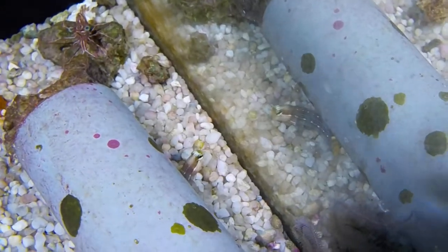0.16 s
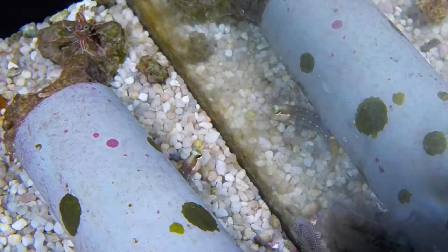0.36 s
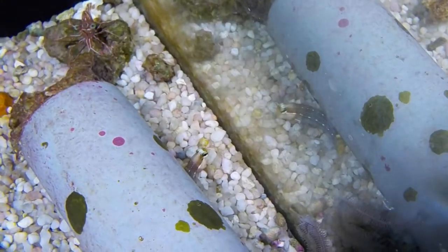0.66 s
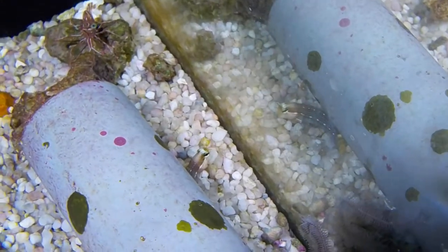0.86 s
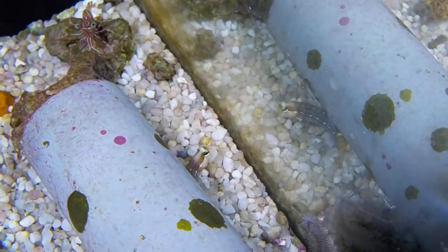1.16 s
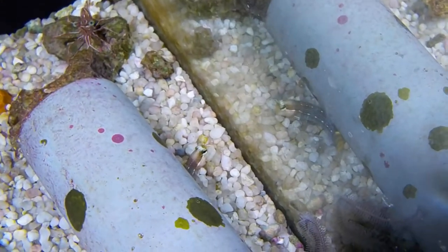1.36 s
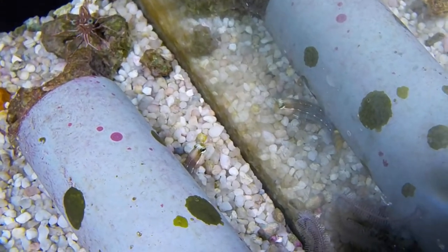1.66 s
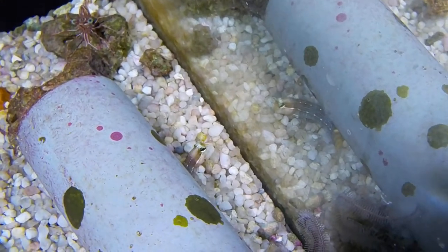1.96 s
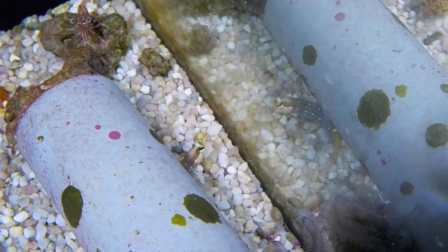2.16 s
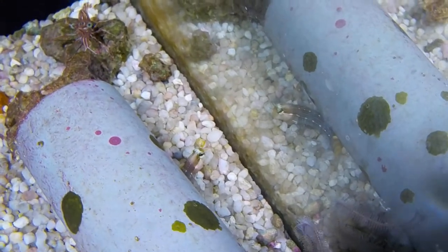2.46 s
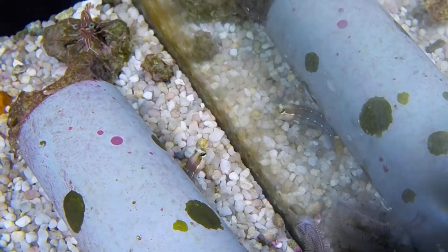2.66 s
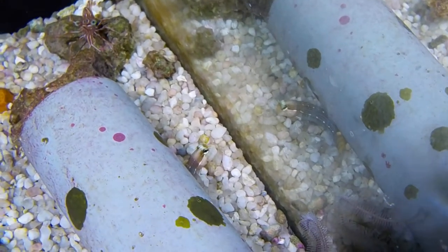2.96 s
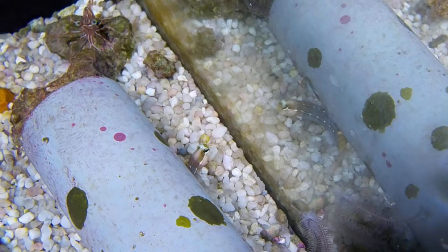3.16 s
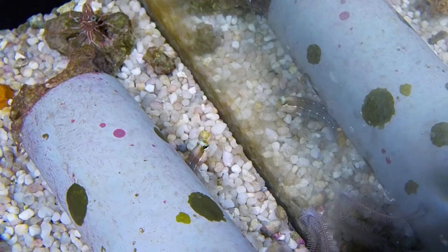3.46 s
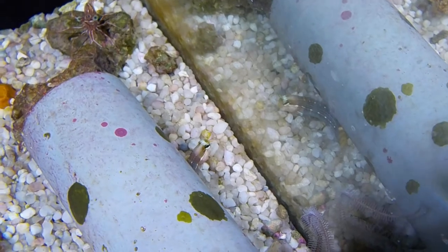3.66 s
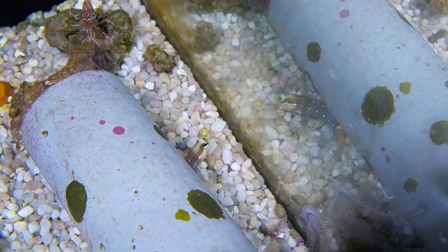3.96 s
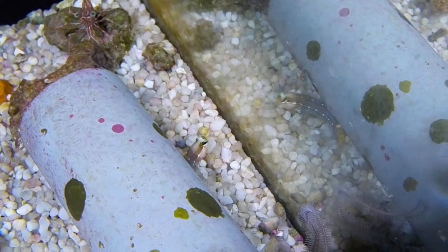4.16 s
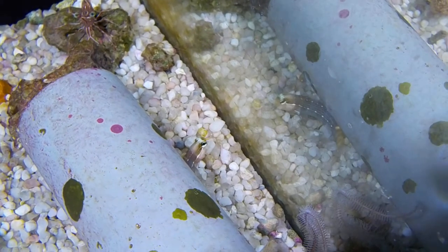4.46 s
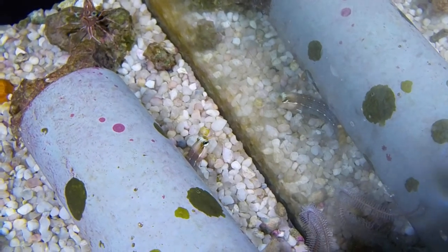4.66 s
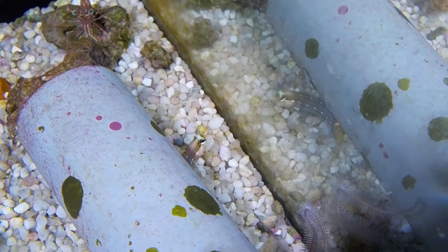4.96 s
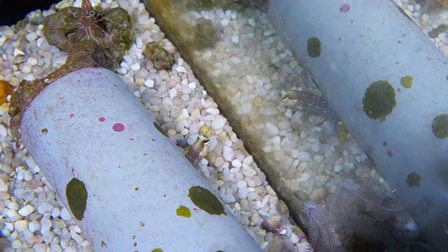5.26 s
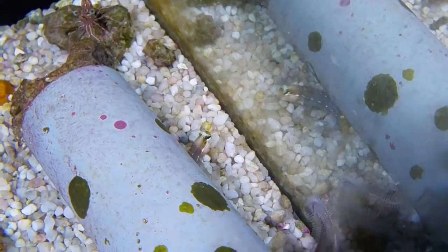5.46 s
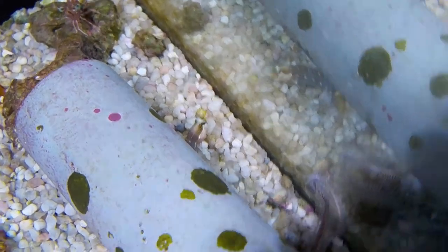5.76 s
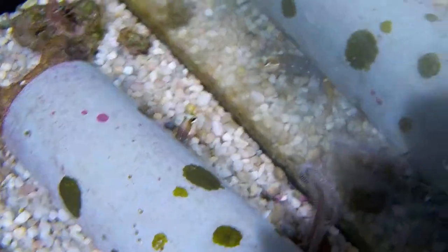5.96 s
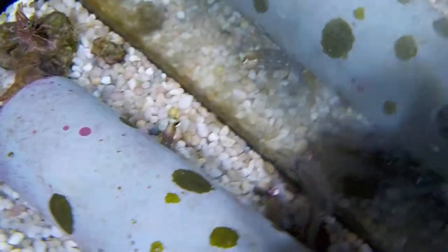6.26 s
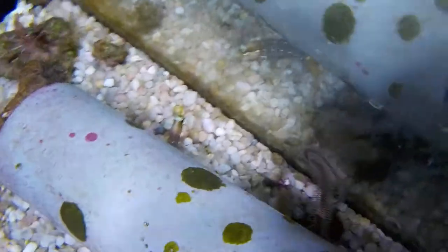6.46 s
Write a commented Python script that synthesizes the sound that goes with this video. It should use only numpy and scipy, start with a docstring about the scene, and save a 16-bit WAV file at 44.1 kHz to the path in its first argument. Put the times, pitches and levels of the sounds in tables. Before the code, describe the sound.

Tiny bubbles fizz brightly at the surface of an indoor aquarium, with short, high pops and faint ticks coming at irregular moments. Underneath, the pumps hum and buzz without a break and water circulates with an even, lightly gurgling rush. A hand-held microphone creeps toward the tank, then closes in faster late on, changing the colour of the sound before the pumps and water swell a little.

```python
"""From the start, mains-driven aquarium pumps buzz through the tank and its stand while water rushes
through the filter. All along, tiny bubbles burst at the surface as a bright fizz, with faint ticks
and some distinct pops. A hand-held camera with two microphones creeps toward the tank, then moves in
quickly from 5.2 s, which shifts the tone of the buzz and the fizz. Just after 6 s the pumps and the
water swell a little."""
import sys
import numpy as np
from scipy import signal
from scipy.fft import rfft, irfft, next_fast_len
from scipy.io import wavfile
from scipy.ndimage import uniform_filter1d

SR = 44100
rng = np.random.default_rng(int(sys.argv[2]) if len(sys.argv) > 2 else 0)


def digitize_waveform(pressure):
    """Quantize a signal to 16-bit integers and store it at the path in sys.argv[1].

    Rows of a 2-D input are taken as channels; values are limited to [-1, 1].
    """
    field = np.atleast_2d(pressure).T
    bounded = np.clip(field, -1, 1)
    quanta = np.round(bounded * 32767).astype(np.int16)
    wavfile.write(sys.argv[1], SR, quanta)


N = 291060
T = np.arange(N) / SR
RUSH_TOP_HZ = 2480  # the water's rush lies below this pitch, the fizz above it


def gain_of(db):
    """Turns decibels into a number to multiply a sound by."""
    return 10 ** (np.asarray(db) / 20)


def unit_level(x):
    """Scales a signal to an average (rms) size of 1."""
    return x / np.sqrt(np.mean(x ** 2) + 1e-20)


def flattened(x):
    """Makes lows and highs equally strong, so that a table alone sets the tone."""
    spectrum = rfft(x)
    power = uniform_filter1d(abs(spectrum) ** 2, size=2000)
    return unit_level(irfft(spectrum / np.sqrt(power + 1e-9), N))


def drift(rate_hz, count=20):
    """A random wobble of average size 1: slow waves added up, none faster than rate_hz."""
    hz = np.geomspace(rate_hz / 20, rate_hz, count)[:, None]
    coarse_t = T[::256]
    waves = np.sin(2 * np.pi * (hz * coarse_t + rng.random((count, 1)))) / np.sqrt(hz)
    return np.interp(T, coarse_t, unit_level(waves.sum(0)))


def bump(t, rise_ms, fall_ms):
    """A smooth rise and fall that peaks at 1 when t = 0."""
    return np.exp(-0.5 * (t * 1000 / np.where(t < 0, rise_ms, fall_ms)) ** 2)


def nearness(move_in_s=5.2):
    """How close the camera is, from -0.15 (far) to 1.4 (closest): a slow creep, then a quick move."""
    return -0.15 + 0.052 * T + 0.87 * np.maximum(T - move_in_s, 0)


def swell(start_s=6.05, rise_s=0.36):
    """Goes from 0 to 1 as pumps and water grow louder with the camera close by."""
    return np.clip((T - start_s) / rise_s, 0, 1)


# Sound travels a different distance to each microphone, so its waves arrive out of step.
# (pitch [Hz], left ahead by [rad])
LEFT_LEAD = [(320, -1.5), (530, -1.4), (900, -0.3), (1500, 0.0), (2050, -0.9), (2650, -1.4), (3000, -0.1),
             (3700, 0.9), (4100, 0.0), (4500, -0.1), (5200, -1.9), (6000, 0.1), (6800, -0.2)]

def at_microphones(direct, scattered, table, low_hz, top_hz):
    """Shapes one band of noise by a table; the right side blends direct and scattered sound."""
    table_hz, *columns = np.transpose(table)
    size = next_fast_len(N)
    hz = np.fft.rfftfreq(size, 1 / SR)
    left_db, right_db, alike = (np.interp(np.log(hz + 1), np.log(table_hz + 1), c) for c in columns)
    lead = np.interp(hz, *np.transpose(LEFT_LEAD))
    alike = np.clip(alike, 0, 1)
    left = rfft(direct, size)
    right = alike * np.exp(-1j * lead) * left + np.sqrt(1 - alike ** 2) * rfft(scattered, size)
    in_band = (hz >= low_hz) & (hz < top_hz)
    pair = np.array([gain_of(left_db) * left, gain_of(right_db) * right]) * in_band
    return np.sqrt(SR / 2) * irfft(pair, size)[:, :N]


def with_echoes(sound, fade_s, echo_db):
    """A surface sound reaches each microphone directly, then as short echoes off glass and lid."""
    t = np.arange(2500) / SR
    paths = rng.standard_normal((2, len(t))) * gain_of(-60 * t / fade_s) * (t > 0.0008)
    paths *= gain_of(echo_db) / np.linalg.norm(paths, axis=1, keepdims=True)
    paths[:, 0] = 1  # the direct path
    return signal.convolve(sound[None], paths)


def place(out, sound, start, db, pan_db):
    """Adds a sound at sample number start, with the left side pan_db louder than the right."""
    out[:, start:start + sound.shape[1]] += gain_of([[db + pan_db / 2], [db - pan_db / 2]]) * sound


# The clearest ticks, probably from the smallest bubbles.
# (time [s], level [dB], pitch [Hz], left minus right [dB])
CLEAR_TICKS = [(0.8169, -55, 9500, 1.0), (0.9292, -56, 8840, 0.5), (0.9945, -56, 9520, 1.0),
               (1.016, -54, 9730, 0.5), (1.3941, -56, 9590, 3.0), (1.6979, -53, 9550, 2.0),
               (2.326, -56, 8860, 0.0), (2.3949, -55, 11400, -1.0), (3.703, -56, 9510, 1.0),
               (3.7767, -54, 9630, 1.5), (5.0578, -58, 9720, 1.0), (5.233, -55, 9960, 1.0),
               (5.3581, -55, 9770, 0.0), (5.3965, -53, 9900, 0.0), (5.5217, -55, 9060, 1.0),
               (6.0266, -51, 9000, 3.0)]

def ticks(faint_count=70):
    """Very short, quiet rings in the high treble: the listed ones plus fainter ones at random."""
    out, t = np.zeros((2, N + 3000)), np.arange(-100, 100) / SR
    times = rng.uniform(100, N, faint_count) / SR
    # random level [dB], pitch [Hz] and left minus right [dB]: averages first, then spreads
    faint = rng.normal([-62, 9600, 0], [3, 400, 4], (faint_count, 3))
    for time_s, db, hz, pan_db in CLEAR_TICKS + list(zip(times, *faint.T)):
        ring = bump(t, rise_ms=0.3, fall_ms=0.6) * np.sin(2 * np.pi * hz * t)
        heard = with_echoes(ring, fade_s=0.04, echo_db=0)
        place(out, heard, round(time_s * SR) - 100, db, pan_db)
    return out[:, :N]


def bubble_swarm(base_per_s=1200, spread_db=6.0, pitch_count=14):
    """Many small bubbles burst at random times and strengths; the higher ones ring more briefly."""
    chance = gain_of(2.5 * drift(30)) * base_per_s / SR
    strength = gain_of(spread_db * np.minimum(rng.exponential(1, N), 2.9))
    bursts = strength * (rng.random(N) < chance)
    which_pitch = rng.integers(0, pitch_count, size=N)
    swarm, t = np.zeros((2, N)), np.arange(200) / SR
    for k, hz in enumerate(np.geomspace(2400, 13000, pitch_count)):
        ring = np.sin(2 * np.pi * hz * t) * np.exp(-t * hz / 1.96) * (1 - np.exp(-t * hz / 1.9))
        heard = with_echoes(ring / np.linalg.norm(ring) * np.sqrt(hz), fade_s=0.063, echo_db=4.8)
        swarm += signal.oaconvolve((bursts * (which_pitch == k))[None], heard, axes=1)[:, :N]
    return flattened(swarm)


# The tone of the fizzing bubbles, and of the hiss above them. Both tables list
# (pitch [Hz], left base level [dB per Hz], right base level [dB per Hz], how alike the sides are [0-1])
FIZZ_TONE = [(2480, -101, -102, 0.09), (2650, -86, -86, 0.75), (2800, -86, -85, 0.87),
             (2980, -94, -92, 0.88), (3170, -87, -83, 0.88), (3300, -88, -83, 0.88), (3500, -79, -78, 0.85),
             (3760, -80, -81.5, 0.81), (3960, -72.5, -75.5, 0.72), (4150, -71, -72.5, 0.68),
             (4420, -74, -74, 0.7), (4560, -73, -71, 0.72), (4730, -77, -74, 0.6), (4890, -75, -72, 0.5),
             (5200, -76, -76, 0.25), (6000, -78, -81, 0.27), (6800, -77, -81, 0.62), (7300, -90, -87, 0.43),
             (7700, -105, -105, 0.12), (8100, -117, -118, 0.0)]
HISS_TONE = [(8100, -117, -118, 0.0), (8600, -104, -106, 0.28), (9300, -101, -103, 0.24),
             (11000, -104, -104, 0.13), (13000, -108, -108, 0.41), (15500, -106, -106, 0.69),
             (15800, -105, -105, 0.75)]

def fizz(blur_share=0.59, shadow_hz=3460, hiss_from_hz=8100):
    """Small bubbles over the blur of far ones; the lowest part is shadowed as the camera nears."""
    swarm, near = bubble_swarm(), nearness()
    blur = rng.standard_normal((2, N))
    bubbles = np.sqrt(1 - blur_share) * swarm + np.sqrt(blur_share) * blur
    low = gain_of(0.6 - 4 * near) * at_microphones(*bubbles, FIZZ_TONE, RUSH_TOP_HZ, shadow_hz)
    main = gain_of(1.3 * near - 1) * at_microphones(*bubbles, FIZZ_TONE, shadow_hz, hiss_from_hz)
    # higher up, the microphones' own hiss hides most of the bubbles
    hiss = 0.26 * signal.sosfilt(signal.butter(2, 11000, fs=SR, output="sos"), swarm) + 0.86 * blur
    high = gain_of(0.8 * drift(16)) * at_microphones(*hiss, HISS_TONE, hiss_from_hz, SR / 2)
    return low + main + high


def bubble_pop(hz, snap, glide_per_s=20):
    """One bubble rings, rising in pitch as it opens; its snapping film adds a longer crackle."""
    t = np.arange(-150, 250) / SR
    ring = bump(t, rise_ms=0.37, fall_ms=0.64) * np.sin(2 * np.pi * hz * t * (1 + glide_per_s * t))
    grit = unit_level(uniform_filter1d(rng.standard_normal((2, len(t))), size=9))
    phase = 2 * np.pi * 1.12 * hz * t  # the crackle sits a little above the ring
    crackle = (grit[0] * np.cos(phase) + grit[1] * np.sin(phase)) * bump(t, rise_ms=0.43, fall_ms=1.5)
    crackle /= abs(crackle).max()
    return (1 - snap) * ring + 3.8 * snap ** 2 * crackle


# The loudest bubbles bursting at the surface.
# (time [s], base level [dB], pitch [Hz], left minus right [dB], snap [0 pure ring - 1 pure crackle])
LOUD_POPS = [(0.174, -27, 6870, 4, .2), (0.6324, -15.5, 4470, -1, 0.1), (0.6395, -33, 6440, 3, .2),
             (0.737, -28, 6700, 2, 0.43), (0.869, -24.5, 4700, -5, 0.49), (0.969, -16.5, 5300, 3, 0.44),
             (0.9836, -25, 4900, 0, .2), (1.005, -21, 4170, -1.0, .35), (1.0528, -33, 6810, 4, .2),
             (1.0668, -27.5, 6000, 6, .3), (1.0845, -20, 4200, 2.0, 0.4), (1.2218, -29, 4300, 0, 0.32),
             (1.2993, -29, 4040, -0.5, 0.28), (1.4388, -29, 4370, 2, 0.55), (1.4686, -25, 4200, 1.0, 0.53),
             (1.508, -29, 4300, 0, .45), (1.545, -28, 4530, -1.5, .2), (1.6436, -17.5, 4300, 0, 0.28),
             (1.7404, -27, 4060, 0.0, .3), (1.75, -22, 6500, 5, 0.33), (1.7821, -17, 4380, 2, 0.16),
             (2.077, -24, 4370, -0.5, 0.3), (2.079, -23, 4120, -0.5, 0.05), (2.301, -24.5, 4830, -2, 0.31),
             (2.41, -25, 7030, 1, .3), (2.4688, -27, 4230, 2, 0.33), (2.569, -28, 4760, -0.5, 0.33),
             (2.89, -24.5, 4300, 2, 0.52), (2.938, -28, 6450, 3.5, .3), (2.983, -32, 6360, 2, .2),
             (3.0054, -35, 5760, 2.5, .3), (3.0217, -22.5, 6700, 5, 0.27), (3.06, -26, 4170, 1.0, .3),
             (3.112, -25, 4500, 0, .35), (3.213, -28, 4500, -2, 0.48), (3.507, -28, 5600, 3, 0.67),
             (3.511, -28, 5300, 2, 0.51), (3.5465, -24, 6900, 2, .45), (3.557, -21.5, 5000, 2.5, 0.48),
             (3.575, -31, 6300, 0, .2), (3.7505, -28, 4900, 0, .3), (3.754, -22, 4030, 7, 0.32),
             (4.0707, -23.5, 5130, 2, 0.52), (4.1615, -26, 4800, 2, 0.33), (4.165, -20, 4300, 4, 0.43),
             (4.179, -26, 6400, 4, .3), (4.2885, -17, 4560, -4, .1), (4.538, -23.5, 4370, -3, .18),
             (4.877, -27, 4970, 0, .25), (4.923, -23, 5700, 3, 0.47), (5.073, -26, 4570, -4, .2),
             (5.157, -33, 4400, 0, .3), (5.227, -30, 6700, 10, 0.41), (5.235, -28, 5000, 4, 0.54),
             (5.415, -24.5, 5730, 4, .45), (5.535, -23.5, 4300, 2, 0.45), (5.543, -29, 5600, 2, 0.52),
             (5.6127, -18, 4370, 1.5, 0.43), (5.8692, -29, 4400, 2, .25), (5.869, -21.5, 6130, 7, 0.55),
             (5.93, -24, 4550, 3, 0.52), (6.386, -25, 5150, 1, 0.6), (6.4067, -26, 4600, 2.5, .45),
             (6.423, -27, 6090, 0.5, 0.46), (6.4744, -32, 4940, 0.0, 0.51)]

def pops(faint_count=30, faint_snap=0.49):
    """Larger bubbles pop, each with a short echo in the tank: the listed ones plus faint random ones."""
    out = np.zeros((2, N + 3000))
    times = rng.uniform(150, N - 150, faint_count) / SR
    # random level [dB], pitch [Hz] and left minus right [dB]: averages first, then spreads
    faint = rng.normal([-35, 5300, 0], [2.5, 900, 2], (faint_count, 3))
    faint_pops = [(time_s, *row, faint_snap) for time_s, row in zip(times, faint)]
    for time_s, db, hz, pan_db, snap in LOUD_POPS + faint_pops:
        # ringing pops stand clearer of their echo than snapping ones
        heard = with_echoes(bubble_pop(hz, snap), fade_s=0.036, echo_db=-5.5 + 11 * snap)
        place(out, heard, round(time_s * SR) - 150, db, pan_db)
    body = signal.sosfiltfilt(signal.butter(6, [3600, 7200], "bandpass", fs=SR, output="sos"), out[:, :N])
    top = signal.sosfiltfilt(signal.butter(4, [8700, 12500], "bandpass", fs=SR, output="sos"), out[:, :N])
    return body + gain_of(-23) * top  # the microphones pass only a trace of the highest snap


# The tone of water rushing through the pumps and filter.
# (pitch [Hz], left base level [dB per Hz], right base level [dB per Hz], how alike the sides are [0-1])
RUSH_TONE = [(30, -112, -113, 0.29), (67, -113, -113, 0.31), (176, -93.5, -104, 0.8),
             (223, -88.5, -88, 0.7), (270, -88, -100, 0.6), (322, -89, -91, 0.8), (351, -75, -87, 1),
             (387, -82, -80.5, 0.97), (433, -74.5, -78.5, 0.97), (514, -67, -67, 1), (540, -71.5, -65.5, 1),
             (610, -66, -64.5, 0.8), (635, -72, -70, 0.4), (722, -72, -59, 0.7), (827, -71, -65.5, 1),
             (1010, -66, -64.5, 0.84), (1250, -68.5, -67.5, 1), (1510, -64.5, -66.5, 0.87),
             (1500, -72, -72.5, 0.87), (1680, -68, -67.5, 1), (1950, -67, -72.5, 1), (2084, -67, -76, 1),
             (2260, -82.5, -83, 0.7), (2407, -101, -102, 0.6)]

def water_rush(gurgle_db=0.95, gurgle_hz=14, split_hz=1100, hump_db=1.3, hump_gap_hz=14):
    """Water churns in pumps and filter; its lower and upper parts each gurgle in their own time."""
    hz = np.fft.rfftfreq(N, 1 / SR)
    # tank and stand ring at many close pitches, which roughens the rush
    humps = rng.standard_normal(round(RUSH_TOP_HZ / hump_gap_hz) + 2)
    tank = gain_of(hump_db * np.interp(hz / hump_gap_hz, np.arange(len(humps)), humps))
    noise_spectrum = rfft(rng.standard_normal((2, N)))
    water = unit_level(irfft(noise_spectrum * np.where(hz < RUSH_TOP_HZ, tank, 1), N))
    level_db = 0.99 + 0.61 * nearness() + 1.8 * swell()
    out = np.zeros((2, N))
    for low_hz, top_hz in [(0, split_hz), (split_hz, RUSH_TOP_HZ)]:
        gurgling = water * gain_of(level_db + gurgle_db * drift(gurgle_hz))
        out += at_microphones(*gurgling, RUSH_TONE, low_hz, top_hz)
    return out


# The tones that make up the pumps' buzz.
# (pitch [times the mains rate], left base level [dB], right base level [dB], left ahead by [rad],
#  level change at nearness 1 [dB])
PUMP_TONES = [(2, -87, -87, 2.5, 2), (2.5, -80, -100, -0.9, 1), (3, -81, -98, -1.1, -2),
              (4, -85, -70, -2.0, 2), (5, -70, -84, -1.4, 0), (6, -78, -68, 0.9, 0), (7, -71, -73, -2.1, 0),
              (8, -63, -48, -2.8, 2), (10, -52, -51, 1.8, 6), (11, -73, -58, 2.2, 3),
              (12, -47.5, -37.5, -2.8, 7.5), (13, -65, -56, -0.8, 3), (14, -51, -34, -0.7, 2),
              (15, -63, -45.5, -1.4, 6), (16, -48, -37, 0.2, -1), (17, -59, -59, -0.7, 10),
              (18, -60, -47, -0.3, 7), (20, -44, -38, -0.4, 3), (21, -60, -55, 0.0, 0),
              (22, -46, -46, -0.1, 0), (23, -57, -58, 0.1, 0), (24, -60, -54, -0.1, 6),
              (25, -47, -46, 0.1, 2), (26, -46, -45, 0.1, 0), (28, -48, -46, 0.4, 0),
              (29, -52, -50, 0.1, -3), (31, -50, -51, 0.4, 3), (32, -44, -47, 0.1, 4),
              (34, -50, -52, 0.0, 2), (35, -50, -52, 0.3, 3), (36, -58, -58, -0.6, 0),
              (37, -48, -50, -0.2, 0), (39, -54, -56, -0.3, -3), (40, -43, -45, -0.4, 4),
              (42, -44, -52, -1.0, -2), (43, -56, -75, -0.4, -3), (46, -67, -84, -0.4, -4),
              (48, -84, -84, -0.2, -4), (51, -78, -76, -2.0, -2), (52, -81, -72, -1.8, 3),
              (56, -73, -75, -0.7, -4), (57, -76, -74, -0.5, -4), (58, -79, -77, -0.9, -4),
              (60, -80, -78, -0.1, -4), (62, -79, -76, -0.2, -4), (64, -74, -70, 0.3, -4),
              (68, -73, -72, 0.3, -2), (70, -64, -62, 0.6, 0), (72, -73, -71, 1.1, 0),
              (78, -66, -76, 0.8, 0), (80, -65, -67, 0.3, 0), (82, -66, -75, 0.9, 0),
              (90, -70, -64, -0.1, 0), (98, -73, -66, -0.5, 0)]

def pump_buzz(mains_hz=50.018, waver_db=0.4, waver_rad=0.12, smear_rad=1.9):
    """Magnet and shaft shake the tank; each tone wavers and changes with the camera's place."""
    cycles, near = mains_hz * T + rng.random(), nearness()
    extra_lead_rad = {4: 0.6, 6: -1.5, 10: -2.1, 12: 0.5}  # for these four tones, at nearness 1
    out = np.zeros((2, N))
    for multiple, left_db, right_db, lead, near_db in PUMP_TONES:
        loudness = gain_of(waver_db * drift(8) + near_db * near)
        # the magnet pulls twice per mains cycle, and the tank smears each pull
        phase = 2 * np.pi * multiple * cycles + smear_rad * rng.standard_normal()
        lead = lead + waver_rad * drift(1.98) + extra_lead_rad.get(multiple, 0) * near
        out[0] += gain_of(left_db) * loudness * np.sin(phase + lead)
        out[1] += gain_of(right_db) * loudness * np.sin(phase)
    return np.sqrt(2) * gain_of(-0.12 - 1.03 * near + 0.88 * swell()) * out


def scene():
    """Pumps, water and bubbles all sound together."""
    return pump_buzz() + water_rush() + fizz() + pops() + ticks()


def record(dry, top_hz=15740):
    """Cuts away the very highest treble."""
    treble_cut = signal.firwin(1023, top_hz, window=("kaiser", 9), fs=SR)
    return signal.oaconvolve(dry, treble_cut[None], "same")


dry = scene()
out = record(dry)
digitize_waveform(out)
```